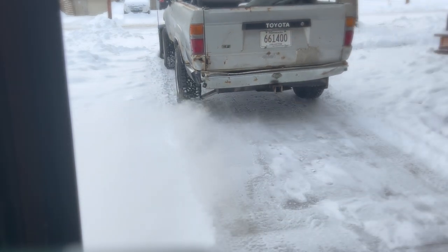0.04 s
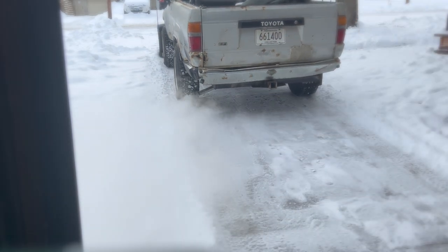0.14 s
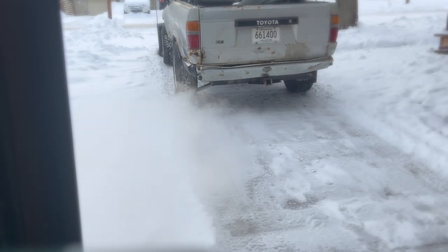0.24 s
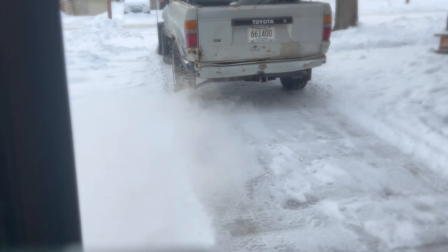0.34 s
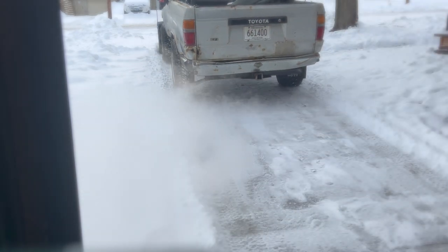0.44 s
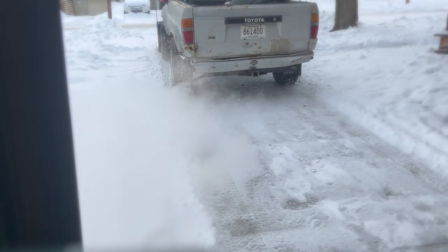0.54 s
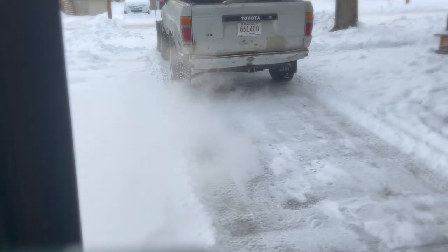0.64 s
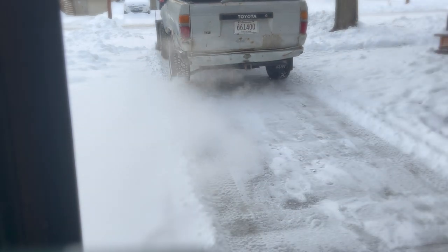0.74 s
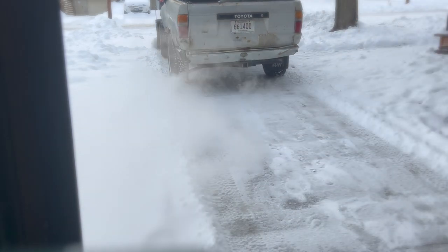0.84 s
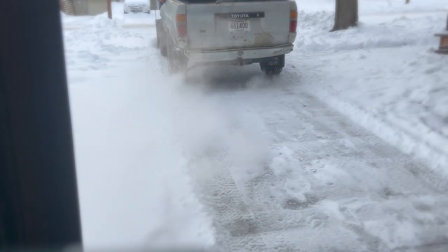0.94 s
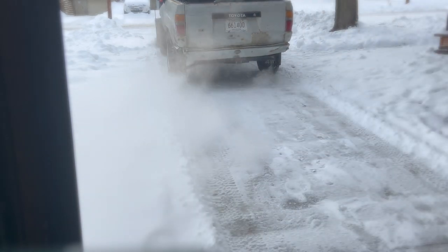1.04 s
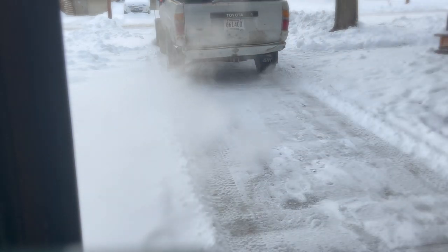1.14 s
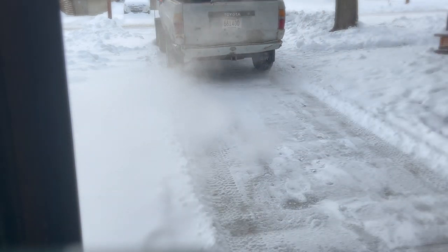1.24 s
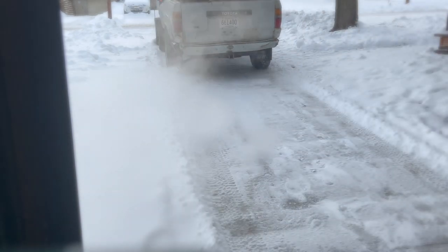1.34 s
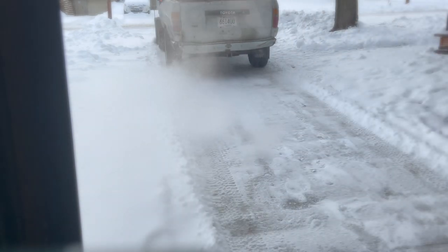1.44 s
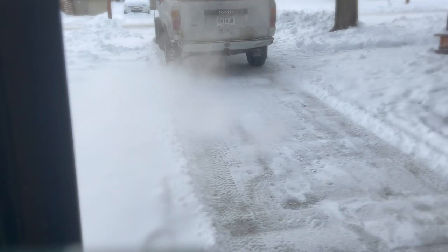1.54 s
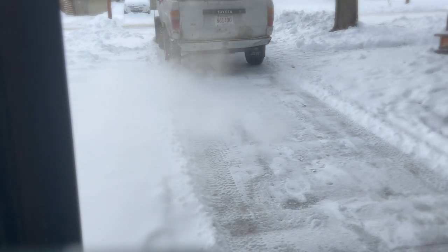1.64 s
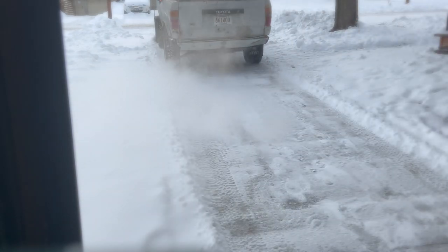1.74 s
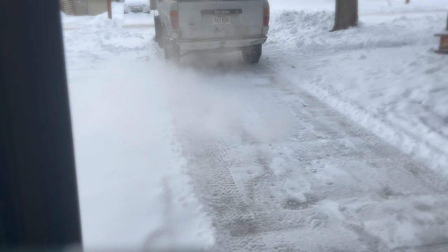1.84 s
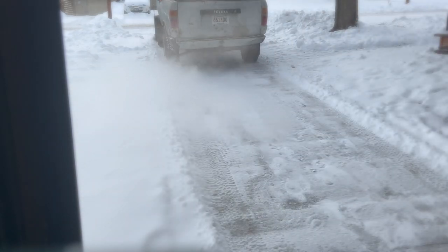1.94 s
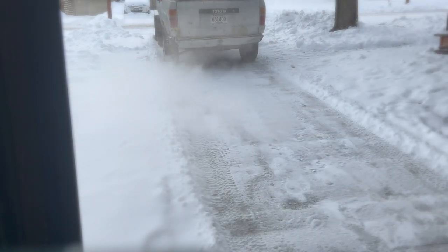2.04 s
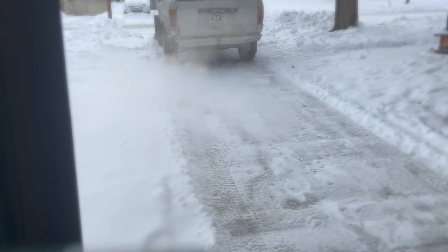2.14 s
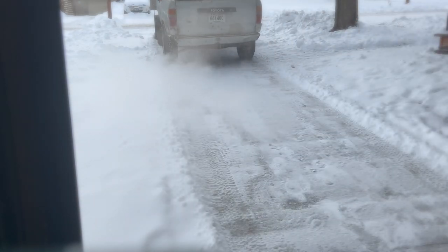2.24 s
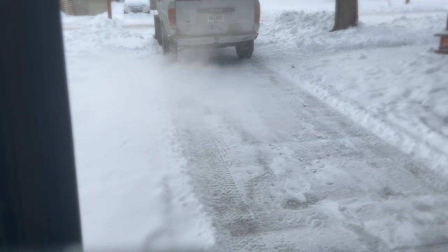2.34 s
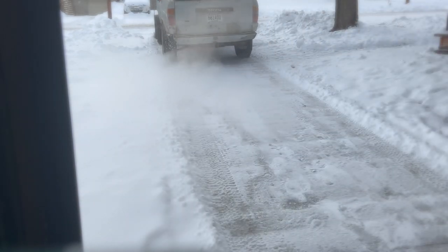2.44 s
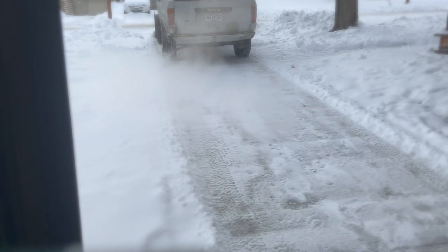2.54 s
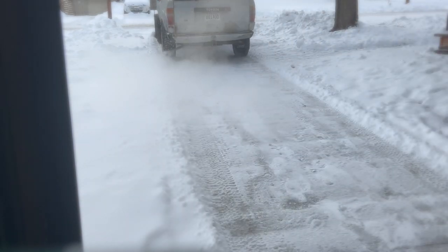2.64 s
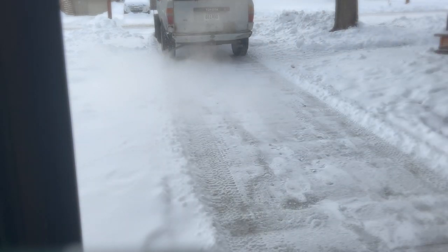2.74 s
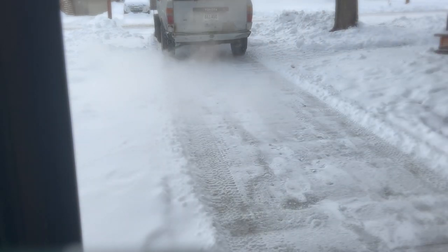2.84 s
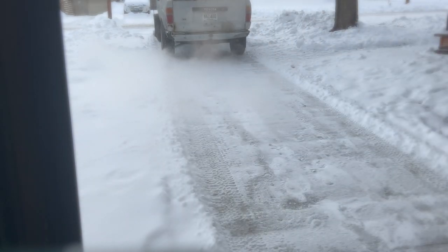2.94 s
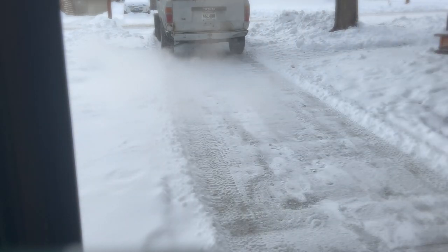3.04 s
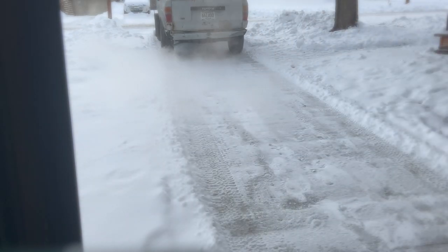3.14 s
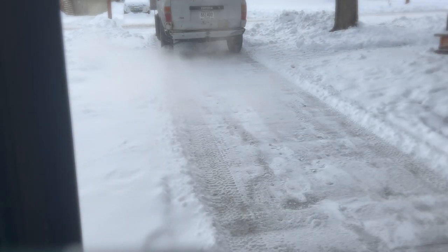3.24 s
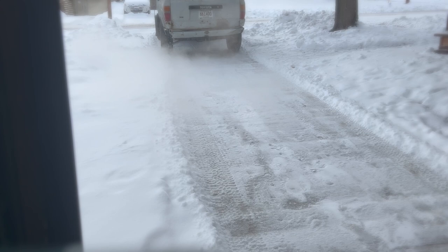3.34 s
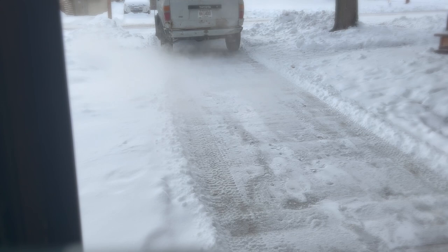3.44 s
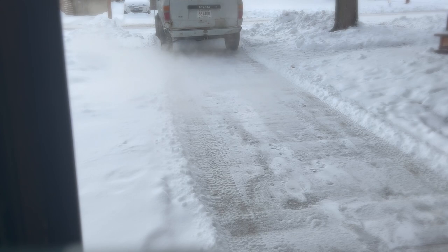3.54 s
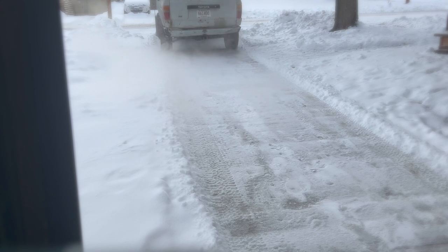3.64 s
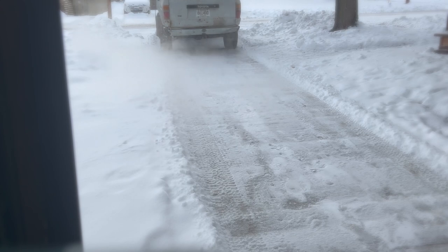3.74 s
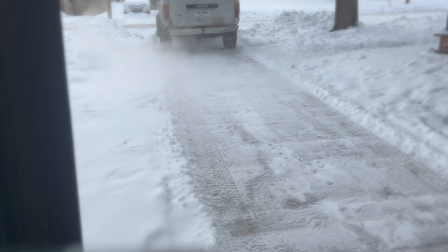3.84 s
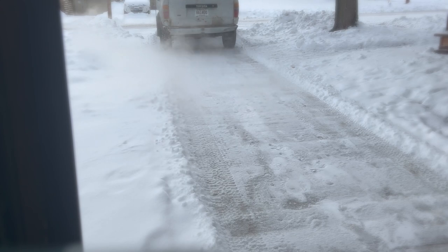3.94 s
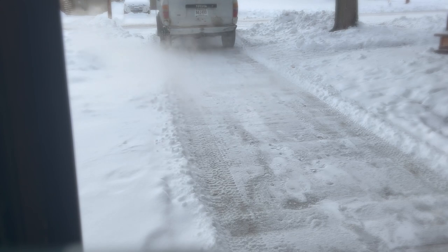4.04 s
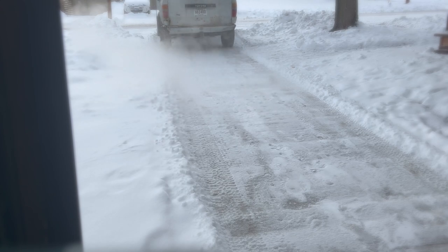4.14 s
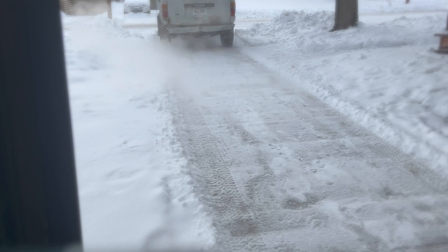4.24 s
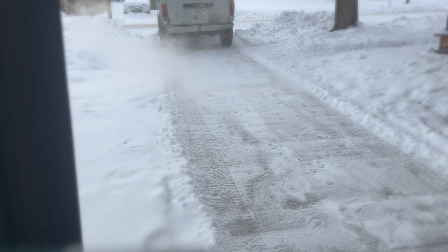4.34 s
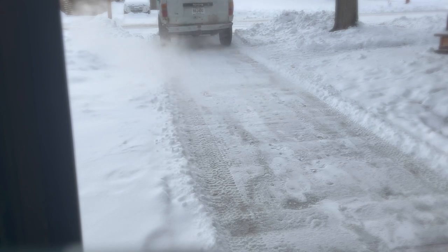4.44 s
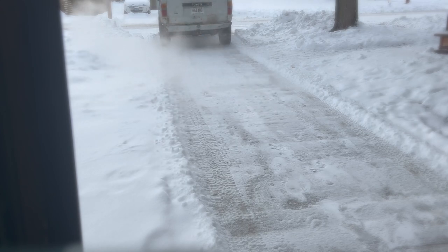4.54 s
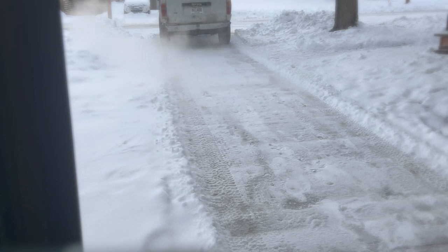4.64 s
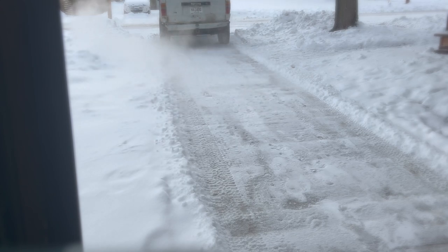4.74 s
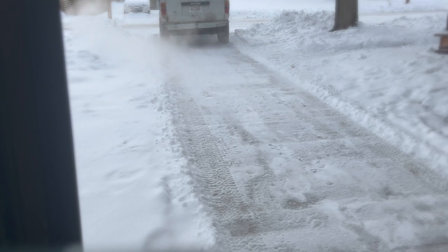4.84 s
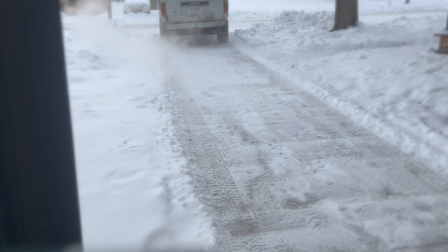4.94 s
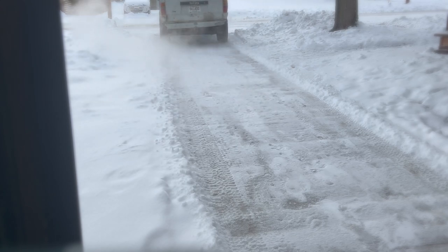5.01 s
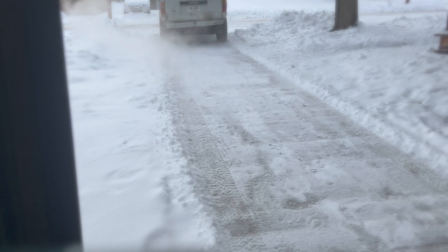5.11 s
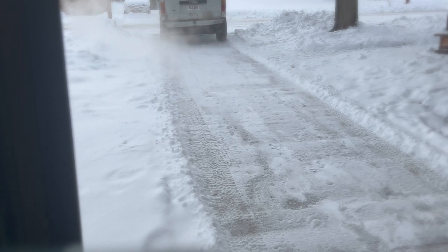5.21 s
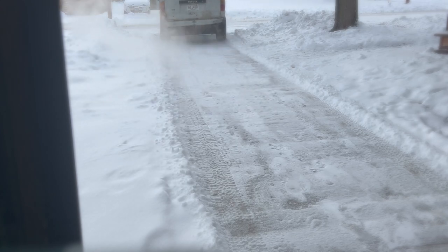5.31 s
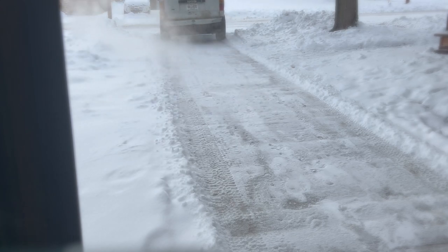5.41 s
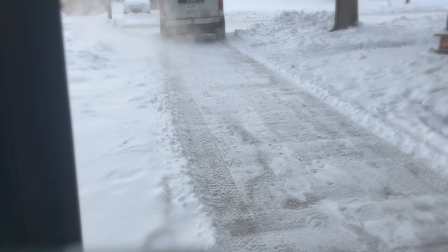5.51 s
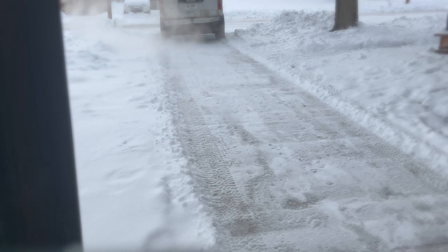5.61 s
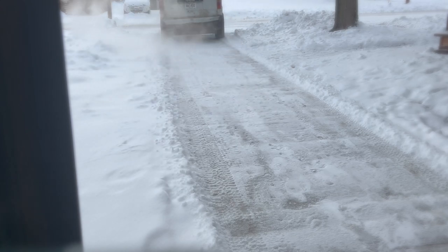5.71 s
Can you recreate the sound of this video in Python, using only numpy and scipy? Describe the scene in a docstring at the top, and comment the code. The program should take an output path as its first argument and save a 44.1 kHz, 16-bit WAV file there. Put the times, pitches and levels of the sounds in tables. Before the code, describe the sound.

Heard from a doorway, a pickup's deep exhaust rumble and tinny engine rattle move off along a snowy drive outdoors. A faint squeak and a few light clinks come as it starts to roll. The engine sags to a brief burble, recovers and holds steady while growing gradually more distant. Meanwhile the tyres crush packed snow, and the body gives low, hollow bumps over the uneven ground.

```python
"""Old pickup on a snowy drive

Heard from a doorway, a four-cylinder pickup pulls away. Its engine sags under load, then settles.
Each firing (fuel burning in one cylinder) makes the exhaust throb and the engine block clatter.
The tyres crush packed snow, the body booms over ruts, and loose parts clink and squeak.
The yard echoes it all, and two microphone openings, left and right, pick it up."""
import sys
import numpy as np
from scipy import signal
from scipy.fft import rfft, irfft
from scipy.io import wavfile
from scipy.ndimage import uniform_filter1d

SR = 44100
rng = np.random.default_rng(int(sys.argv[2]) if len(sys.argv) > 2 else 0)


def int16_out(signal):
    """Quantize to a 16-bit WAV file."""
    q = np.round(np.clip(np.atleast_2d(signal).T, -1, 1) * 32767)
    wavfile.write(sys.argv[1], SR, q.astype(np.int16))


N = 254456
TIME = np.arange(N) / SR


def undb(db):
    """Turn decibels (dB) into a number to multiply by."""
    return 10 ** (np.asarray(db) / 20)


def unit(x):
    """Scale a sound to an average strength (rms) of one."""
    return x / np.sqrt(np.mean(x ** 2))


def steady(x, span_s):
    """Hold the strength near one over every short span."""
    return x / np.sqrt(np.abs(uniform_filter1d(x ** 2, int(span_s * SR))) + 1e-18)


def curve(table, at=TIME):
    """Join a table's points with straight lines and read off the values."""
    return np.interp(at, *np.transpose(table))


def wander(rate_hz):
    """A smooth random drift, about one in size."""
    hold = max(int(SR / rate_hz), 1)
    steps = np.repeat(rng.standard_normal(N // hold + 1), hold)
    return unit(uniform_filter1d(steps, hold)[:N])


def swell(centre_s, length_s):
    """A smooth rise to one and back."""
    return np.cos(np.pi * np.clip((TIME - centre_s) / length_s, -.5, .5))


def blow(age_s, rise_s):
    """The shape of a hit: up to one in rise_s, then dying away."""
    age = np.maximum(age_s, 0) / rise_s
    return age * np.exp(1 - age)


def bursts(push, decay_s):
    """Each push sets off a puff of noise that dies away."""
    energy = signal.lfilter([1], [1, -np.exp(-2 / (decay_s * SR))], push ** 2 + 1e-18)
    return np.sqrt(energy) * rng.standard_normal(N)


def colour(x, points, size=16384):
    """Make some frequencies louder and others softer, following (Hz, dB) points."""
    hz, db = np.transpose(points)
    freqs = np.maximum(np.fft.rfftfreq(size, 1 / SR), 1)
    gain = undb(np.interp(np.log(freqs), np.log(hz), db))
    # fold the filter so that a hit rings after it lands, never before
    cepstrum = irfft(np.log(gain))
    cepstrum[1:size // 2] *= 2
    cepstrum[size // 2 + 1:] = 0
    return signal.fftconvolve(x, irfft(np.exp(rfft(cepstrum))))[:N]


def resonance(x, hz, width_hz):
    """Ring at one pitch; the narrower the width, the longer the ring."""
    return signal.lfilter(*signal.iirpeak(hz, hz / width_hz, fs=SR), x)


def metal_ring(x, notes):
    """Shaken metal rings at several notes, each filtered twice to make it purer."""
    return sum(undb(db) * resonance(resonance(x, hz, width), hz, width) for hz, width, db in notes)


def scatter(x, t60_s):
    """Smear each hit over many random paths, keeping its tone; t60_s sets how long."""
    t = TIME[:SR // 2]
    paths = rng.standard_normal(len(t)) * np.exp(-np.log(1000) * t / t60_s)
    phase = np.angle(rfft(paths, 2 * N))
    return irfft(rfft(x, 2 * N) * np.exp(1j * phase))[:N]


# The yard's echo. Each row: frequency in Hz, level in dB against the direct sound.
ECHO_TONE = [(30, -15), (60, -42), (120, -9), (250, -13.5), (600, -6.5), (1300, -4.5), (1900, -1.5),
             (2400, -24.5), (4400, -11.5), (15000, -86)]

def yard_echo(x, t60_s, delay_s=0.01):
    """Walls and snow banks scatter the sound back, with opposite signs left and right."""
    late = np.interp(TIME - delay_s, TIME, scatter(x, t60_s), left=0)
    return colour(late, ECHO_TONE) * np.array([[1], [-1]])


# Suspension squeaks. Each row: middle in seconds, length in seconds, pitch in Hz, level in dB.
SQUEAKS = [(.19, .45, 1030, -53), (.185, .07, 1036, -42.5), (2.592, .05, 5000, -57.5)]

def suspension_squeaks():
    """The suspension rubs and gives short, rough squeaks as it flexes."""
    out = 0
    for centre_s, length_s, hz, db in SQUEAKS:
        cycles = np.cumsum(hz * (1 + .015 * wander(250))) / SR
        rough_gain = undb(db + 4.0 * wander(145.8))
        out += np.sin(2 * np.pi * cycles) * rough_gain * swell(centre_s, length_s)
    return out


# Loose parts knocking. Each row: start in seconds, level in dB, pitch in Hz.
CLINKS = [(.4015, -45, 2950), (.491, -47, 2100), (.8006, -38.5, 2950), (1.468, -47, 490), (1.612, -48, 560),
          (2.445, -47, 3000), (2.547, -45, 2850), (2.7457, -47, 2850), (2.796, -46, 2850),
          (2.8195, -44, 3100)]

def loose_parts(rise_cycles=7, pair_ratio=0.96, pair_db=-8):
    """Loose metal rings with two close notes; the lower the pitch, the longer it rings."""
    out, t = np.zeros(N), TIME[:SR // 10]
    for start_s, db, hz in CLINKS:
        ring = np.sin(2 * np.pi * hz * t) + undb(pair_db) * np.sin(2 * np.pi * pair_ratio * hz * t)
        out[int(start_s * SR):][:len(t)] += undb(db) * ring * blow(t, rise_cycles / hz)
    return out


# A wheel drops into a rut. Each row: start in seconds, level in dB, pitch in Hz.
RUTS = [(1.588, -35, 65), (2.159, -31.5, 78.4), (2.661, -34, 74.7), (3.11, -36, 66.2), (3.839, -32, 76.5),
        (4.192, -28.5, 65.2), (4.287, -28.5, 65.7), (5.68, -31.5, 50.3)]

def rut_booms(attack_s=.008, decay_s=0.071):
    """The load bed swings up and booms once at each rut."""
    out = 0
    for start_s, db, hz in RUTS:
        age = np.maximum(TIME - start_s, 0)
        envelope = (1 - np.exp(-age / attack_s)) * np.exp(-age / decay_s)
        out += undb(db) * np.cos(2 * np.pi * hz * age) * envelope
    return out


# Lumps of snow. Each row: start in seconds, thud level in dB, crunch level in dB.
LUMPS = [(2.155, -28, -45), (2.879, -39, -42), (3.100, -37, -42), (3.122, -34, -47), (3.174, -39, -38),
         (3.238, -28, -42), (3.366, -35, -44), (3.386, -31, -41), (3.494, -35, -41), (3.589, -33, -46),
         (3.638, -40, -44), (4.198, -30, -44), (4.250, -33, -45), (4.273, -31, -44), (4.901, -34, -44),
         (5.325, -30, -40), (5.366, -29, -43)]
# The notes of a struck wheel and its spring. Each row: pitch in Hz, level in dB.
WHEEL_NOTES = [(128, -12), (205, -3.5), (272, -16)]
# The tone of crunching snow. Each row: frequency in Hz, level in dB.
SNOW_TONE = [(60, -47), (200, -2), (350, 2), (550, 1), (800, -4.5), (1050, -5.5), (1300, -10), (1600, -19),
             (3000, -18), (7000, -23.5), (15000, -87)]

def snow_lumps(give_s=0.0055, level_db=-3):
    """A whole lump gives way in an instant: the wheel thuds and the snow crunches."""
    thud, crunch_gain = 0, 0
    for start_s, thud_db, crunch_db in LUMPS:
        age = TIME - start_s
        force = blow(age, give_s)
        ring = sum(undb(db) * np.cos(2 * np.pi * hz * (age - give_s)) for hz, db in WHEEL_NOTES)
        thud += undb(thud_db) * force * ring
        crunch_gain += undb(crunch_db) * force
    crunch = crunch_gain * unit(colour(rng.standard_normal(N), SNOW_TONE))
    return undb(level_db) * (thud + crunch)


# Patches of packed snow. Each row: middle and length in seconds, then crunch, rumble and spray in dB.
PATCHES = [(1.087, 0.31, -54, -43.5, -66), (1.46, 0.36, -58, -52.5, -68), (1.621, 0.08, -54.5, -70, -78),
           (2.21, 0.13, -52.5, -45.5, -82), (2.598, 0.34, -44.5, -41.5, -62.5),
           (2.884, 0.14, -50, -49.5, -67), (3.129, 0.18, -48.5, -45, -63), (3.266, 0.19, -51, -45, -63),
           (3.378, 0.3, -46, -49.5, -75), (3.508, 0.04, -49, -46, -58), (3.636, 0.14, -45.5, -42, -72),
           (3.91, 0.28, -49, -43.5, -82), (4.272, .19, -45.5, -43.5, -59), (4.664, 0.38, -52, -45, -70),
           (4.87, 0.15, -47, -45, -67), (5.055, 0.54, -53.5, -45, -71), (5.348, 0.28, -47, -42, -76),
           (5.58, 0.12, -46.5, -42, -77), (5.728, 0.24, -45.5, -46, -64.5)]
CRUNCH, RUMBLE, SPRAY = range(3)

def snow_patches(steady_db, sound):
    """How strong a tyre sound is: a steady part, plus a swell through each patch."""
    power = sum((undb(levels[sound]) * swell(centre_s, length_s)) ** 2
                for centre_s, length_s, *levels in PATCHES)
    return np.sqrt(undb(steady_db) ** 2 + power)


# The steady crunch of rolling. Each row: time in seconds, level in dB.
ROLLING_LEVEL = [(0.0, -46), (0.8, -46.5), (1.43, -51.5), (3.02, -51), (3.3, -49.5), (3.7, -49),
                 (4.1, -54.5), (4.45, -52.5), (5.56, -45.5), (5.77, -47)]
# The wheel arches ringing. Each row: pitch in Hz, width in Hz, level in dB against the crunch.
ARCH_NOTES = [(387.3, 6.6, -3), (519, 12, -7), (599, 23, -12), (888, 8.7, -4), (950, 16, -4.5),
              (1224, 26, -6.5)]
# The tone of the tyres' rumble. Each row: frequency in Hz, level in dB.
RUMBLE_TONE = [(30, -53), (90, -4.5), (160, 0.5), (215, 7), (270, 3), (350, -14.5), (700, -36.5),
               (3000, -69)]
# The load bed's hollow note: pitch in Hz, width in Hz, level in dB against the rumble.
BED_NOTE = (215, 4.3, -16.5)

def tyres(cracks_per_s=1100, spread_db=2.0):
    """Snow packs down in crowds of tiny cracks; the tyres rumble with them and stir the load bed."""
    cracks = (rng.random(N) < cracks_per_s / SR) * rng.choice([-1, 1], N)
    cracks = cracks * undb(spread_db * np.minimum(rng.exponential(size=N), 4))
    crush = (unit(cracks) + 0.63 * rng.standard_normal(N)) * undb(wander(45))
    snow = colour(crush, SNOW_TONE)
    arches = sum(undb(db) * resonance(snow, hz, width) for hz, width, db in ARCH_NOTES)
    rolling_db = curve(ROLLING_LEVEL)
    crunch = unit(snow + arches) * snow_patches(rolling_db + 0.14, CRUNCH)
    rumble = steady(colour(crush, RUMBLE_TONE), span_s=0.11)
    bed_hz, bed_width_hz, bed_db = BED_NOTE
    bed = undb(bed_db) * steady(resonance(rumble, bed_hz, bed_width_hz), span_s=0.35)
    return crunch + (rumble + bed) * snow_patches(rolling_db + 2.5, RUMBLE)


# The tone of the truck's body. Each row: frequency in Hz, level in dB.
BODY_TONE = [(25, -51), (42, 2), (56, -10.5), (68, 4.5), (84, -4), (112, -5), (135, -9), (170, -18.5),
             (400, -71), (2000, -78)]

def body_drone(start_db=-5, build_s=0.46):
    """The body drones on its springs, more as the truck gets going and at each patch of snow."""
    rolling_db = curve(ROLLING_LEVEL)
    moving_off_db = start_db * np.clip(1 - TIME / build_s, 0, 1)
    shaking_db = -48 + moving_off_db + 0.93 * (rolling_db - rolling_db.mean())
    drone = steady(colour(rng.standard_normal(N), BODY_TONE), span_s=0.15)
    return drone * snow_patches(shaking_db, RUMBLE) * undb(2.5)


# The hiss of air and powdery snow. Each row: frequency in Hz, level in dB.
HISS_TONE = [(100, -16), (500, -10.5), (1400, -3), (2200, 1), (3000, -2.5), (4300, -8), (5300, -13),
             (7100, -12), (9300, -12), (11000, -12.5), (12800, -22.5), (15400, -24)]

def hiss(flutter_db, flutter_hz, keep, edge_hz):
    """Fluttering noise, keeping only its "low" or its "high" side."""
    noise = rng.standard_normal(N) * undb(flutter_db * wander(flutter_hz))
    band = signal.butter(2, edge_hz, keep, fs=SR, output="sos")
    return signal.sosfilt(band, unit(colour(noise, HISS_TONE)))


def fan(load_db):
    """Air rushes through the fan and falls away as the engine sags."""
    air = hiss(flutter_db=1.6, flutter_hz=90, keep="low", edge_hz=5000)
    return air * undb(-52.5 + 0.99 * load_db)


def powder_spray(load_db):
    """Powdery snow hisses with the engine's effort and the rolling, and sprays up at each patch."""
    powder = hiss(flutter_db=1.5, flutter_hz=120, keep="high", edge_hz=5500)
    steady_db = -63.0 + 0.45 * load_db + 0.51 * (curve(ROLLING_LEVEL) + 52)
    return powder * snow_patches(steady_db, SPRAY) * undb(12.5)


def firings(count, cylinder_db, spread_db, jitter_s):
    """One push each time the count passes a whole number; no two are alike in size or timing."""
    at = np.flatnonzero(np.diff(np.floor(count)) > 0)
    size, late = rng.standard_normal((len(at), 2)).T
    at = np.clip(at + (late * jitter_s * SR).astype(int), 0, N - 1)
    push = np.zeros(N)
    push[at] = undb(np.resize(cylinder_db, len(at)) + spread_db * size)
    return push


# The heat shield's notes. Each row: pitch in Hz, width in Hz, level in dB.
SHIELD_NOTES = [(1048, 34, 0.5), (1212, 47, -2), (1287, 21, 2.5), (1343, 28, 1.5), (1434, 33, -0.5),
                (2442, 13, -2.5), (2720, 31, -9)]
# How loudly it rings. Each row: time in seconds, level in dB.
SHIELD_LEVEL = [(0, -52), (1.1, -57), (1.5, -61.5), (2.8, -59), (5.77, -69.5)]

def heat_shield(count):
    """Firings keep a tinny shield ringing; it fades as the engine sags and the truck draws away."""
    push = firings(count, [0], spread_db=1.5, jitter_s=.001)
    ring = metal_ring(bursts(push, decay_s=.02), SHIELD_NOTES)
    return steady(ring, span_s=0.2) * undb(curve(SHIELD_LEVEL))


# The tone of the engine covers' clack. Each row: frequency in Hz, level in dB.
COVER_TONE = [(300, -50), (1400, -20), (1900, -9), (2200, -.5), (2450, -7), (2750, -8), (3020, 4),
              (3250, -7), (3900, -9.5), (4300, -3.5), (4900, -16), (6000, -30), (15000, -42)]

def cover_clack(count):
    """Thin metal covers touch, then strike, at each firing: a round, ringing clack."""
    touch = firings(count + .07, [-5], spread_db=1.5, jitter_s=.0003)
    strike = firings(count - .02, [0, -1, .4, -.7], spread_db=1.2, jitter_s=.0003)
    clack = scatter(touch, t60_s=.03) + scatter(strike, t60_s=.036)
    return unit(colour(clack, COVER_TONE)) * undb(-56.5)


# The notes of the engine block and its covers. Each row: pitch in Hz, width in Hz, level in dB.
BLOCK_NOTES = [(960, 93, 3.5), (1039, 54, 10), (1327, 120, 7), (1424, 24, 7.5), (1664, 140, 7.5),
               (2145, 280, 9), (2430, 48, 7), (2710, 270, -1), (3024, 210, 8), (3450, 600, -1),
               (4290, 390, -9)]
# The tone of the crack of burning fuel. Each row: frequency in Hz, level in dB.
CRACK_TONE = [(100, -34), (400, 6), (1000, 11), (1400, 5.5), (1750, -2), (3500, -26), (4600, -19),
              (5300, -15), (7100, -6), (9000, 7), (11000, -6), (15400, -16)]

def engine_clatter(count, load_db, rise_s=0.0029):
    """Each firing sends a quick rattle through the block and covers; valves tick faintly in between."""
    push = firings(count + .03, [0], spread_db=1.5, jitter_s=.0001)
    valves = firings(count - .48, [-40, -17, -21, -9], spread_db=-0.5, jitter_s=0.0028)
    rattle = signal.fftconvolve(push, blow(TIME[:SR // 20], rise_s))[:N] * rng.standard_normal(N)
    thump = scatter(push, t60_s=.022)
    ticks = bursts(valves, decay_s=.006)
    knock = unit(rattle) + .45 * unit(thump) + .25 * unit(ticks)
    ring = unit(metal_ring(knock, BLOCK_NOTES)) * undb(-57.5)
    crack = unit(colour(knock, CRACK_TONE)) * undb(-61.0)
    return (ring + crack + cover_clack(count)) * undb(load_db)


# What the silencer lets through of the exhaust tones. Each row: frequency in Hz, level in dB.
SILENCER = [(30, -50), (36, -50), (38.5, -42.5), (41, -37), (45, -36), (60, -44), (64, -39.5), (71, -49),
            (75, -39.5), (80, -49), (87, -33.5), (91, -37), (96, -42), (104, -47), (112, -38.5),
            (115.5, -43), (120, -49.5), (135, -43), (150, -62), (165, -67), (180, -53.5)]

def exhaust_tones(firing_hz, count, drive_db, slack):
    """The silencer passes four deep tones: even under load, burbling when the engine goes slack."""
    tones = 0
    for k in range(4):
        db = curve(SILENCER, at=(k + 1) * firing_hz) + drive_db
        waver_db = (1.1 + 1.3 * slack) * wander(14)
        chug_db = 2.5 * (k > 1) * wander(30)  # top two tones only
        # the deepest tone falls behind as the speed climbs through the silencer's resonance
        shift = 0.093 * k ** 2 if k else -0.046 * (firing_hz - firing_hz.mean())
        stumble = 0.071 * slack * wander(16)
        cycles = (k + 1) * (count + stumble) + shift
        tones += undb(db + waver_db + chug_db) * np.sqrt(2) * np.cos(2 * np.pi * cycles)
    return tones


def exhaust_lope(count):
    """Strong and weak cylinders take turns, adding an uneven throb between the tones."""
    lower = np.cos(2 * np.pi * 1.5 * count) * undb(4.2 * wander(12))
    upper = np.cos(2 * np.pi * 2.5 * count) * undb(-2 + 3.8 * wander(22))
    return lower + upper


# The tone of the tailpipe's puffs. Each row: frequency in Hz, level in dB.
PIPE_TONE = [(70, -54), (130, 2), (190, -1), (280, -3.5), (400, -13.5), (700, -37.5), (1500, -21.5),
             (4000, -31.5), (12000, -60)]

def exhaust(firing_hz, count, load_db, start_m=2.6, speed_m_per_s=2.3):
    """The tailpipe puffs gas at each firing, over tones and a throb that fade with distance."""
    distance_db = -20 * np.log10(1 + speed_m_per_s * TIME / start_m)
    slack = np.clip(load_db / load_db.min(), 0, 1)  # 0 when pulling, 1 at the least effort
    drive_db = 0.38 * load_db + 0.22 * distance_db
    tones = exhaust_tones(firing_hz, count, drive_db, slack)
    lope = exhaust_lope(count) * undb(-44.5 + load_db + distance_db)
    push = firings(count, [-3.0, 1.3, -0.8, -7.0], spread_db=2.0, jitter_s=0.00014)
    gas = unit(bursts(push, decay_s=0.018))
    puffs = unit(colour((.5 + .5 * slack) * gas - unit(push), PIPE_TONE))
    return tones + lope + puffs * undb(-51.5 + 0.69 * load_db)


# Engine speed. Each row: time in seconds, firings per second.
ENGINE_SPEED = [(0, 42.88), (0.13, 45.02), (0.5, 45.3), (0.82, 44.78), (0.95, 42.35), (1.04, 37.8),
                (1.22, 32), (1.32, 33.3), (1.48, 30.2), (1.62, 31.9), (1.8, 37.13), (2.1, 38),
                (2.46, 39.76), (2.85, 40.5), (3.3, 39.61), (3.8, 38.1), (4.15, 38.44), (4.48, 38.98),
                (5.3, 37.51), (5.77, 38.18)]
# How hard the engine works. Each row: time in seconds, level in dB.
ENGINE_EFFORT = [(0.0, -50.5), (0.75, -50.3), (0.92, -54.5), (1.19, -61.5), (1.54, -61), (1.72, -54.5),
                 (2.62, -52), (4.16, -55.5), (4.4, -53.5), (5.26, -55.5), (5.77, -55)]

def scene(cruise_db=-51):
    """The engine, body and wheels together, with the yard around them."""
    firing_hz = curve(ENGINE_SPEED)
    count = np.cumsum(firing_hz) / SR + .02  # firings so far
    load_db = curve(ENGINE_EFFORT) - cruise_db  # more effort lifts exhaust, clatter and fan together
    engine = exhaust(firing_hz, count, load_db) + engine_clatter(count, load_db)
    engine += heat_shield(count) + fan(load_db)
    spray = powder_spray(load_db)
    body = body_drone() + rut_booms() + loose_parts() + suspension_squeaks()
    truck = engine + spray + body + tyres() + snow_lumps()
    return truck + yard_echo(truck, t60_s=0.25)


# How far the left opening's wave runs ahead of the right. Each row: frequency in Hz, phase in radians.
LEFT_LEAD = [(0, 0), (3200, 0), (4500, .4), (5000, 1.1), (5500, 2.2), (6400, 2.3), (6900, 3), (7400, 3.3),
             (7800, 4.6), (8350, 5.7), (9400, 6.28), (10400, 6.7), (11800, 9.1), (13700, 9.7),
             (14500, 12.2), (15500, 12.57)]
# Left level minus right level. Each row: frequency in Hz, level in dB.
LEFT_BALANCE = [(40, -1.5), (65, 3), (110, -1.5), (200, -2), (380, -3), (700, -3.5), (1290, -0.5),
                (2380, 0.5), (4400, -2), (8120, -3), (15000, 3)]

def record(dry, top_hz=15750):
    """The two openings differ a little in level and fall out of step in the treble; the top is cut."""
    freqs = np.fft.rfftfreq(2 * N, 1 / SR)
    half_each = np.array([[.5], [-.5]])
    lead = curve(LEFT_LEAD, at=freqs) * half_each
    balance = undb(curve(LEFT_BALANCE, at=freqs) * half_each)
    stereo = irfft(rfft(dry, 2 * N) * np.exp(1j * lead) * balance)[:, :N]
    return signal.sosfilt(signal.ellip(10, .2, 80, top_hz, fs=SR, output="sos"), stereo)


dry = scene()
out = record(dry)
int16_out(out)
```